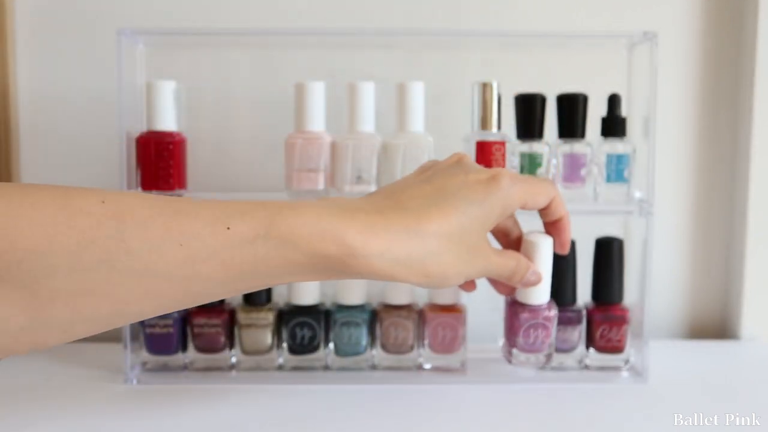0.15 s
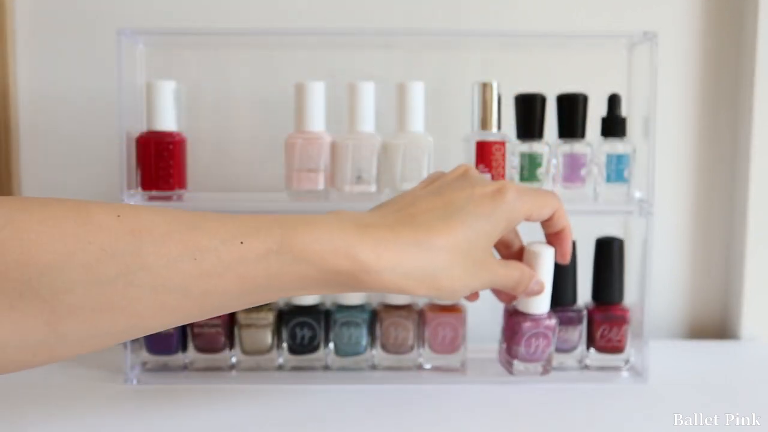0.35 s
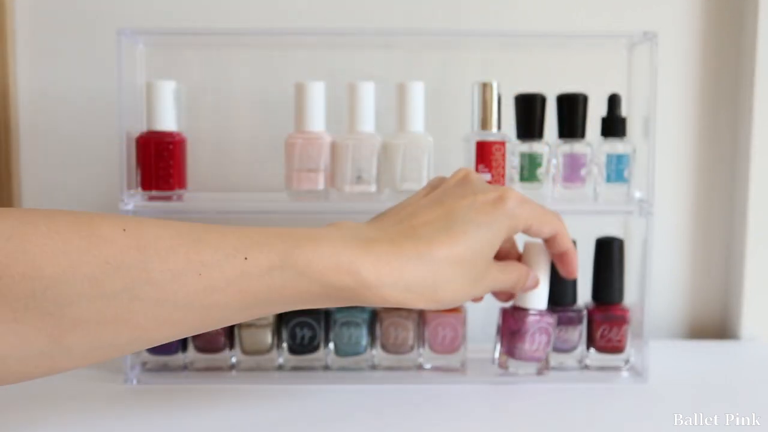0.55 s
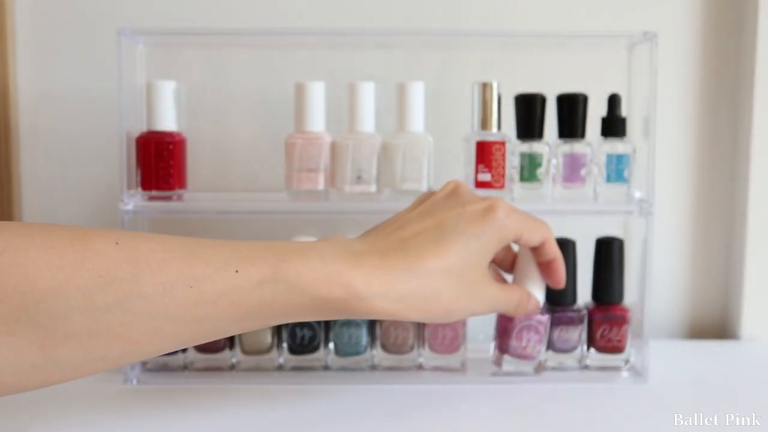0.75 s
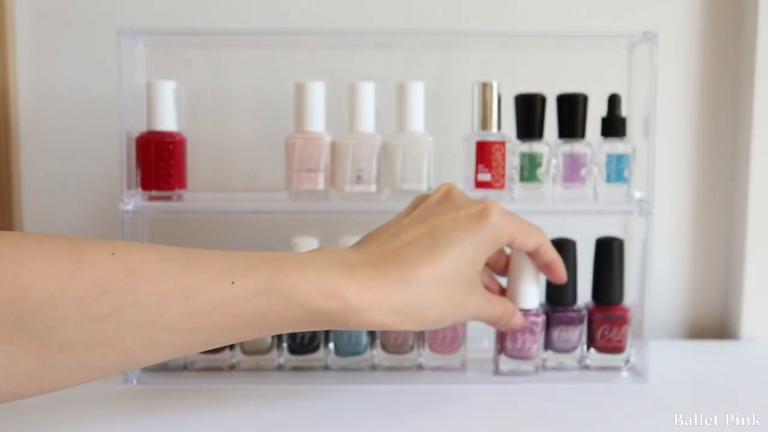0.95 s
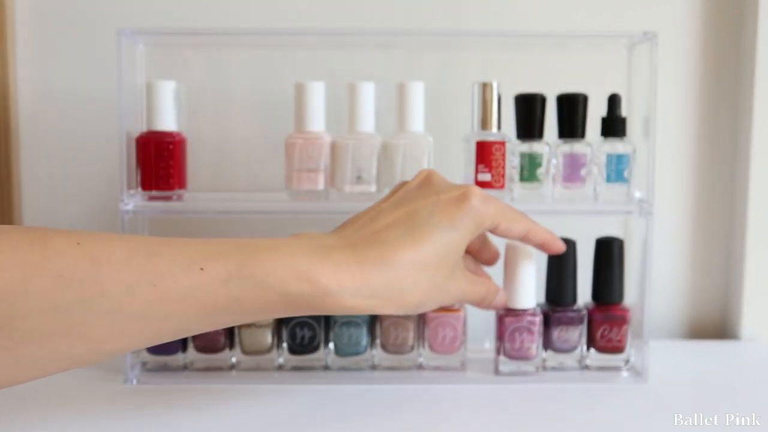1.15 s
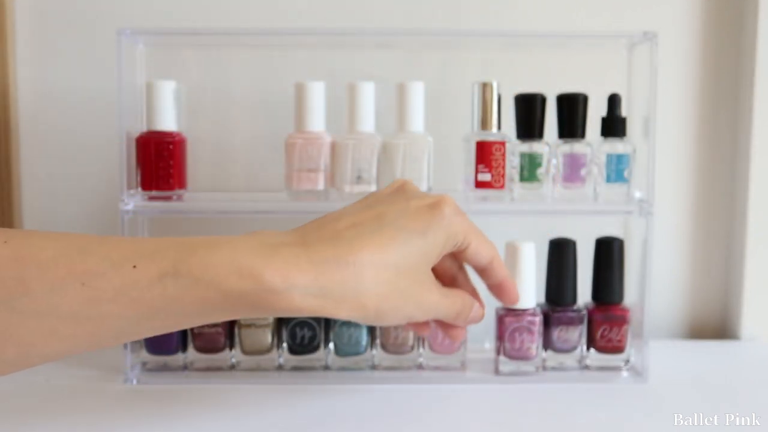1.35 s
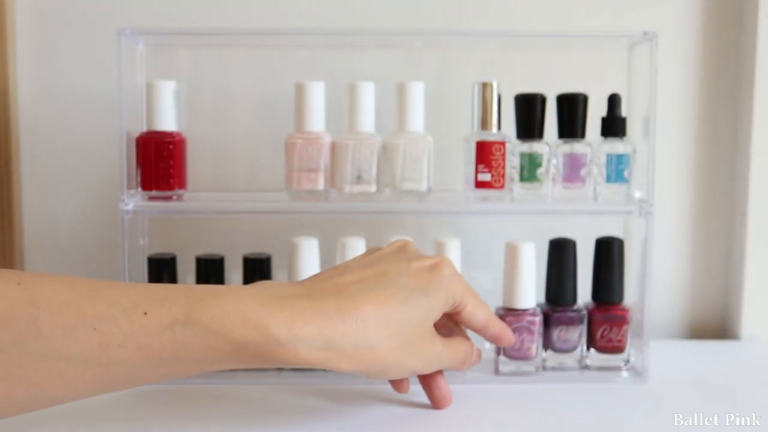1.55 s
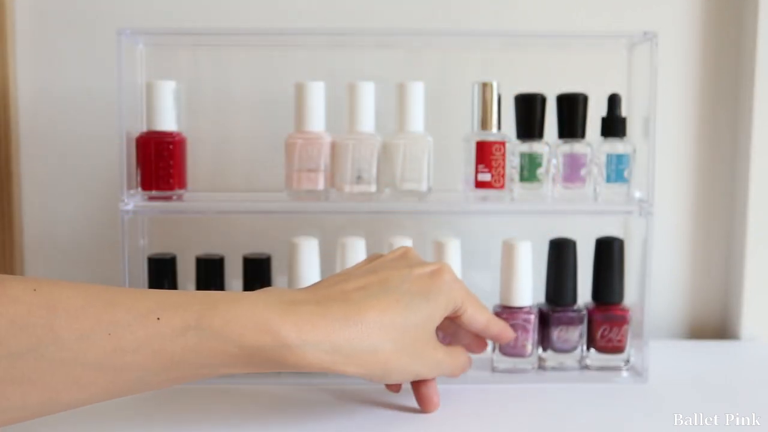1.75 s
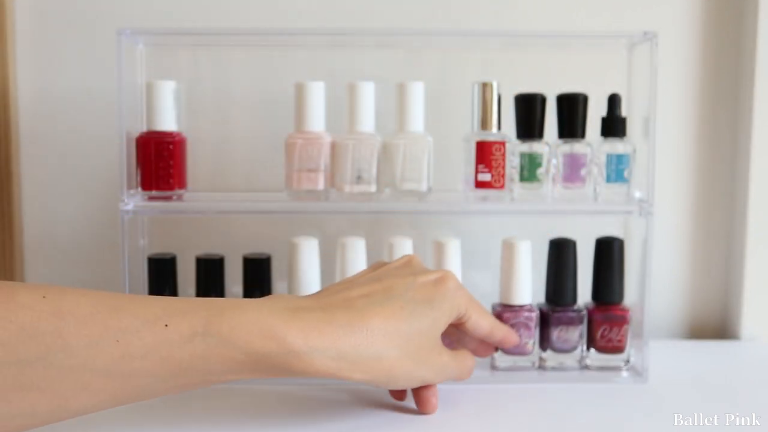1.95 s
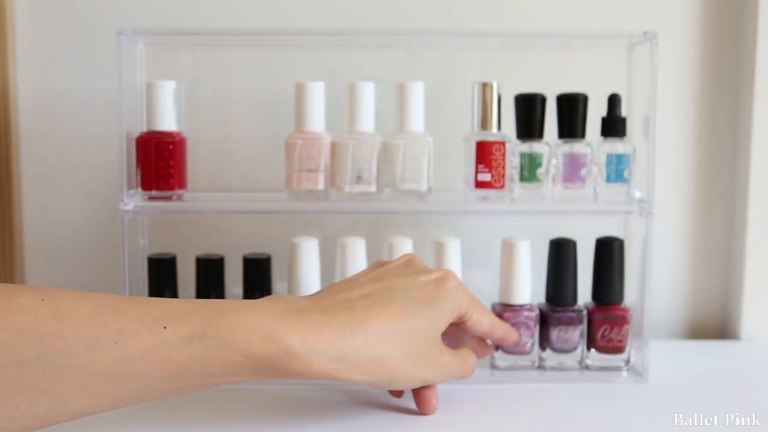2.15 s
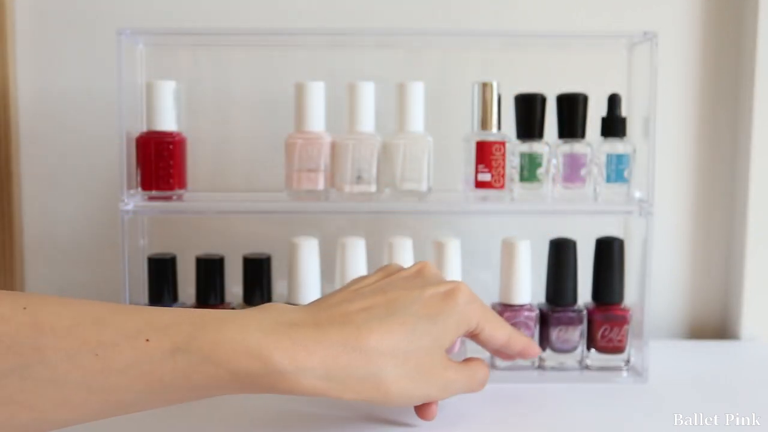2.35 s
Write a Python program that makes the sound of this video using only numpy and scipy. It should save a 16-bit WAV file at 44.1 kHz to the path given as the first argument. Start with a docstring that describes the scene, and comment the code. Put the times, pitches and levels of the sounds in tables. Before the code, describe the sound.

Small glass bottles knock and click against a clear plastic rack in a small, lively room.

```python
"""A small, lively room, where small glass bottles are set down and nudged into line on a clear plastic rack.
Bases knock on the shelf and sides click on the rack's wall: short impulses ringing banks of damped modes.
Bases scrape as runs of tiny slips, a finger thuds on the table as one low mode, and fingertips brush
the caps as swells of high band noise. Echoes, standing waves and a decaying noise tail make the room,
over a faint steady bed of shaped noise."""
import sys
import numpy as np
from scipy import signal
from scipy.fft import rfft, irfft
from scipy.io import wavfile

SR = 44100
rng = np.random.default_rng(int(sys.argv[2]) if len(sys.argv) > 2 else 0)


def int16_out(signal):
    """Quantize to a 16-bit WAV file."""
    q = np.round(np.clip(np.atleast_2d(signal).T, -1, 1) * 32767)
    wavfile.write(sys.argv[1], SR, q.astype(np.int16))


N = 105840
T = np.arange(N) / SR


def from_db(db):
    """Decibels to gain."""
    return 10 ** (np.asarray(db) / 20)


def cut(x, hz, kind="low", order=2):
    """Butterworth filter; the tiny offset keeps its state from fading into denormal numbers."""
    sos = signal.butter(order, hz, kind, fs=SR, output="sos")
    return signal.sosfilt(sos, x + 1e-18)


def resonance(x, hz, t60):
    """One damped mode: a two-pole ring that falls 60 dB in t60 seconds, with gain 1 at its peak."""
    radius = from_db(-60 / (t60 * SR))
    zeros = np.array([1, 0, -1]) * (1 - radius * radius) / 2
    poles = [1, -2 * radius * np.cos(2 * np.pi * hz / SR), radius * radius]
    return signal.lfilter(zeros, poles, x + 1e-18)


def body(x, modes):
    """A solid object's ring: its modes in parallel, with alternating signs."""
    total = 0
    for k, (hz, db, t60) in enumerate(modes):
        total = total + (-1) ** k * from_db(db) * resonance(x, hz, t60)
    return total


def favour(x, hz, db, q=12.7):
    """Bring out one pitch with a resonance of sharpness q, or hold it back."""
    t60 = np.log(1000) / np.pi * q / hz
    return x + (from_db(db) - 1) * resonance(x, hz, t60)


def tap(delay_s=0):
    """A unit impulse in half a second of silence, leaving time to ring out."""
    return signal.unit_impulse(SR // 2, int(delay_s * SR))


def add(bus, start_s, sound, room_db):
    """Place a sound on the direct path and, room_db louder, on the send into the room."""
    i = int(start_s * SR)
    bus[:, i:i + len(sound)] += np.outer([1, from_db(room_db)], sound[:N - i])


# a bottle's base meets the shelf: [t/s, level/dB, low edge f/Hz, contact cut-off f/Hz,
#   first favoured f/Hz, its level/dB, second favoured f/Hz, its level/dB, room send level/dB]
BASE_KNOCKS = [(.070, -20, 119, 1670, 617, 3.7, 1170, 6, 1),
               (0.3791, 19, 53.7, 2754, 960, 6, 1643, 8.9, 0.5),
               (.383, -4.5, 57, 2590, 151, 13.5, 1240, 12, 1.5),
               (0.545, -5.5, 149, 1070, 843, 10.6, 1050, 3.1, 0),
               (.570, -4, 150, 1200, 980, 9.6, 1600, 4, -1.5),
               (0.636, -11.5, 80, 1870, 300, 18, 1900, 2.5, -2),
               (.729, -13.5, 99, 1550, 518, 16.1, 2100, 4.6, 1),
               (0.7682, 0, 151, 1100, 767, 17.5, 1830, 8.4, -11.5),
               (0.936, -7, 110, 1640, 314, 11.6, 1155, 7.1, 1.5),
               (.948, -7, 110, 2100, 1148, 7.8, 3700, 11.4, -2),
               (1.052, -21, 100, 2110, 310, 12, 1900, 2.6, 0),
               (1.1131, -9, 120, 2230, 300, 4, 1900, 6.3, 0.5),
               (1.1372, 11.5, 200, 1800, 763, 17.5, 1976, 7.2, -6),
               (1.148, 13.5, 101, 1870, 710, 3.4, 969, 9, 0),
               (1.151, 3.5, 100, 2410, 1614, -0.5, 2800, 7.4, -4.5),
               (1.723, -12.5, 148, 1070, 390, 7, 910, 2, -6),
               (2.087, 14.5, 326, 1360, 535, 12.4, 952, 12.6, -3.5),
               (2.107, -1.5, 403, 2010, 2570, 3, 3150, 9, 2),
               (2.170, 1, 355, 1120, 794, 4.8, 1900, 4.9, -1.5),
               (2.212, 0, 80, 1095, 350, 9.8, 880, 2.7, 2),
               (2.219, 2, 151, 1090, 887, 12.4, 2000, 5.7, -18.5)]
# damped modes of the plastic shelf: [f/Hz, level/dB, t60/s]
SHELF_MODES = [(131, -0.5, 0.066), (225, -4.5, 0.03), (334, -5, 0.016), (464.8, -0.5, 0.018),
               (671.5, -3.5, 0.011), (895, 0.5, .03), (1026, -3, 0.033), (1276, -3, 0.014),
               (1574, -4.5, 0.0083), (1921, 0, 0.011), (2610, -5, 0.006), (3180, -7, .01),
               (3940, -3.5, 0.0079)]
# the crack is at its base level at the reference cut-off, and fades as the contact softens
KNOCK_CRACK_DB, CRACK_REFERENCE_HZ, CRACK_DB_PER_OCTAVE = -21.5, 2450, 24.5
# the crack is the rattle of neighbouring bottles, off to the side, so it is weaker on the direct path
CRACK_DIRECT_DB = -5.5


def knocks():
    """Bases on the shelf: harder contacts are brighter and crack more, and each favours two pitches."""
    bus = np.zeros((2, N))
    for (start_s, db, low_hz, cut_hz, first_hz, first_db,
         second_hz, second_db, room_db) in BASE_KNOCKS:
        push = cut(tap(), cut_hz, order=3)
        push = cut(push, low_hz, "high")
        push = favour(push, first_hz, first_db)
        push = favour(push, second_hz, second_db)
        add(bus, start_s, from_db(db) * body(push, SHELF_MODES), room_db)

        hardness_octaves = np.log2(cut_hz / CRACK_REFERENCE_HZ)
        crack_db = db + KNOCK_CRACK_DB + CRACK_DB_PER_OCTAVE * hardness_octaves
        # the room send keeps the crack at its full level
        add(bus, start_s, from_db(crack_db + CRACK_DIRECT_DB) * crack(), room_db - CRACK_DIRECT_DB)
    return bus


# a bottle's side hits the wall: [t/s, level/dB, contact cut-off f/Hz, favoured f/Hz, its level/dB,
#   room send level/dB]
SIDE_CLICKS = [(0.237, 11.5, 9700, 2380, 4, -4.5), (0.2544, 4.5, 8600, 2250, 1.5, 0),
               (.691, -21, 2900, 2280, 13.5, -1), (1.7383, 9, 11100, 2083, 1.5, 0),
               (1.7459, -16, 8570, 880, 2, -21), (1.842, -7.5, 4860, 510, 7, -2)]
# modes of the rack's wall, before the damping limit: [f/Hz, level/dB, t60/s]
WALL_MODES = [(135, -9, 0.037), (296.3, -2, .04), (436, 4.5, 0.036), (881, 4.5, 0.017), (1060, -2.5, .035),
              (1190, -2.5, .03), (1950, -0.5, 0.0039), (2406, 1.5, 0.0094), (2930, -5, 0.0052),
              (3830, -3.5, 0.0084), (4540, -4, 0.011), (7020, -8.5, 0.0062), (10450, -17.5, .002)]
WALL_MAX_CYCLES = 42   # the loaded plastic limits every mode's t60 to this many cycles
FLEX_BELOW_HZ, FLEX_LAG_S = 1430, .004   # low modes need the whole rack to flex, and start later
CLICK_CRACK_DB = -16.5


def clicks():
    """Hard, bright contacts of glass with the rack's wall: a snap, then the low flexing of the rack."""
    modes = [(hz, db, min(t60, WALL_MAX_CYCLES / hz)) for hz, db, t60 in WALL_MODES]
    low_modes = [mode for mode in modes if mode[0] < FLEX_BELOW_HZ]
    high_modes = [mode for mode in modes if mode[0] >= FLEX_BELOW_HZ]
    flex = body(tap(FLEX_LAG_S), low_modes)
    snap = cut(body(tap(), high_modes), FLEX_BELOW_HZ, "high", order=5)

    bus = np.zeros((2, N))
    for start_s, db, cut_hz, ring_hz, ring_db, room_db in SIDE_CLICKS:
        ring = snap + flex + from_db(CLICK_CRACK_DB) * crack()
        ring = cut(ring, cut_hz, order=3)
        ring = favour(ring, ring_hz, ring_db, q=3.8)
        add(bus, start_s, from_db(db) * ring, room_db)
    return bus


# nominal trips to and fro in the plate, varied at each contact: [trip time/s]
NOMINAL_TRIPS = (.00023, .00041, .00067)
CRACK_LOW_HZ, CRACK_HIGH_HZ = 3400, 9070
TRIP_FEEDBACK = .45   # share fed back on each trip


def crack():
    """A bright snap, smeared over a few milliseconds by plate trips that differ from spot to spot."""
    x = tap()
    for trip_s in NOMINAL_TRIPS * rng.uniform(.6, 1.6, 3):
        # an all-pass loop smears the snap in time without colouring it
        loop = np.r_[1, np.zeros(int(trip_s * SR)), TRIP_FEEDBACK]
        x = signal.lfilter(loop[::-1], loop, x + 1e-18)
    x = cut(x, CRACK_LOW_HZ, "high")
    return cut(x, CRACK_HIGH_HZ, order=3)


# a base drags over the shelf: [t/s, length/s, level/dB, contact cut-off f/Hz]
BASE_SCRAPES = [(0.199, .035, -22.5, 1300), (.5, .13, -16.5, 1100), (.65, .1, -23.5, 900),
                (0.943, .03, -14, 1500), (1.124, .02, -8.5, 1500), (1.701, .035, -23, 1000),
                (2.069, .026, -12, 900)]
SLIPS_PER_S = 450   # on average


def scrapes():
    """Runs of tiny, unevenly timed and sized slips shake the shelf and ring its modes."""
    bus = np.zeros((2, N))
    for start_s, length_s, db, cut_hz in BASE_SCRAPES:
        times = np.cumsum(rng.uniform(.2, 1.8, size=200)) / SLIPS_PER_S
        sizes = rng.choice([-1, 1], size=200) * rng.uniform(.4, 1, size=200)
        sizes = sizes * (times < length_s)
        slips = np.bincount((times * SR).astype(int), sizes, minlength=SR // 2)
        rub = cut(slips, cut_hz, order=3)
        add(bus, start_s, from_db(db) * body(rub, SHELF_MODES), room_db=0)
    return bus


BUMP_S, BUMP_DB, BUMP_ROOM_DB = 1.635, 10, -5
BUMP_HZ, BUMP_T60_S, BUMP_SOFT_HZ = 159, .043, 219   # table mode, its decay, fingertip cut-off


def bump():
    """A finger on the table: a soft push rings one low mode as a thud."""
    bus = np.zeros((2, N))
    thud = resonance(cut(tap(), BUMP_SOFT_HZ), BUMP_HZ, BUMP_T60_S)
    add(bus, BUMP_S, from_db(BUMP_DB) * thud, BUMP_ROOM_DB)
    return bus


# fingertips brush a cap: [centre t/s, half length/s, level/dB]
CAP_BRUSHES = [(0.034, 0.11, -66), (0.25, 0.058, -56.5), (0.667, 0.02, -71), (1.355, 0.041, -66.5)]
BRUSH_LOW_HZ, BRUSH_HIGH_HZ = 6300, 9530


def brushes():
    """Skin on the caps: faint high noise that swells and fades in bell-shaped swishes."""
    swish = cut(rng.standard_normal(N), [BRUSH_LOW_HZ, BRUSH_HIGH_HZ], "band")
    swells = np.zeros(N)
    for centre_s, half_s, db in CAP_BRUSHES:
        swells += from_db(db) * np.exp(-((T - centre_s) / half_s) ** 2)
    return swish / swish.std() * swells


# the room's diffuse reverberation: [f/Hz, level against the sound sent in/dB, t60/s]
REVERBERATION = [(60, 11.5, .6), (129.7, 1.5, 0.31), (280, 8, 0.34), (561.6, 3.5, 0.24), (1017, 4, 0.26),
                 (1900, -2.5, 0.26), (4020, 2, 0.33), (7700, -1, 0.33), (13930, 0.5, .28)]
ROOM_DELAY_S, ROOM_BUILD_S = .0013, .0012


def diffuse_tail():
    """Scattered reflections: bands of noise that build up fast and die at their own rates."""
    hz, wet_db, t60 = np.transpose(REVERBERATION)
    f = np.arange(SR // 2 + 1)
    t = np.maximum(T[:SR] - ROOM_DELAY_S, 0)
    build = 1 - np.exp(-t / ROOM_BUILD_S)
    white = rfft(rng.standard_normal(SR))
    response = np.zeros(SR)
    edges = np.geomspace(40, 17000, 28)
    for low, high in zip(edges, edges[1:]):
        centre = np.log(low * high) / 2
        db = np.interp(centre, np.log(hz), wet_db)
        decay_s = np.interp(centre, np.log(hz), t60)
        band = irfft(white * (f >= low) * (f < high))
        tail = band * np.exp(-np.log(1000) * t / decay_s) * build
        # at 0 dB a band holds as much energy as the same band of a unit impulse
        band_gain = np.sqrt(2 * (high - low) / SR)
        response += from_db(db) * band_gain * tail / np.linalg.norm(tail)
    return response


# standing waves of the room: [f/Hz, level against the sound sent in/dB]
STANDING_WAVES = [(135, 7.5), (243, 8.5), (457, 4.5), (525, -0.5), (575, 3.5), (794, 12), (888, 3),
                  (944, -0.5), (995, 6.5), (1168, 6), (1233, 12.5), (1640, 5)]


def standing_waves():
    """Waves trapped between surfaces: single pitches that ring as long as the reverberation there."""
    hz, _, t60 = np.transpose(REVERBERATION)
    waves = [(wave_hz, db, np.interp(wave_hz, hz, t60)) for wave_hz, db in STANDING_WAVES]
    return body(signal.unit_impulse(SR, int(ROOM_DELAY_S * SR)), waves)


# reflections off the table and the back wall: [t/s, level/dB]
NEAR_ECHOES = [(.0035, -10.5), (.008, -21)]


def room(x):
    """Two near echoes, standing waves and a diffuse tail, convolved with the sound sent in."""
    response = diffuse_tail() + standing_waves()
    for delay_s, db in NEAR_ECHOES:
        response[int(delay_s * SR)] += from_db(db)
    return signal.fftconvolve(x, response)[:N]


# spectrum of the steady background: [f/Hz, relative level per Hz/dB]
HISS_SPECTRUM = [(25, -12.5), (60, -8), (120, -11), (220, -13), (800, -20), (2000, -24), (5300, -28),
                 (15500, -30)]
HISS_DB = -66.5   # overall RMS level


def hiss():
    """A steady bed of low rumble and faint hiss: white noise shaped to one smooth spectrum."""
    hz, db = np.transpose(HISS_SPECTRUM)
    f = np.maximum(np.fft.rfftfreq(N, 1 / SR), 1)
    shape = from_db(np.interp(np.log(f), np.log(hz), db))
    noise = irfft(rfft(rng.standard_normal(N)) * shape, N)
    return from_db(HISS_DB) * noise / noise.std()


def scene():
    """All contacts, direct and through the room; shelf and wall each have their own path into it."""
    shelf = knocks() + scrapes() + bump()   # the bump shares the shelf's path
    wall = clicks()
    mix = brushes() + hiss()
    for direct, sent in (shelf, wall):
        mix = mix + direct + room(sent)
    return mix[None]


def record(dry):
    """The top is cut steeply above 16 kHz."""
    top_cut = signal.ellip(10, .1, 70, 16000, fs=SR, output="sos")
    return signal.sosfilt(top_cut, dry)


dry = scene()
out = record(dry)
int16_out(out)
```